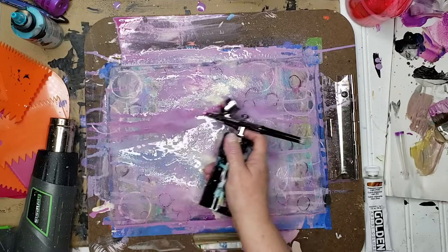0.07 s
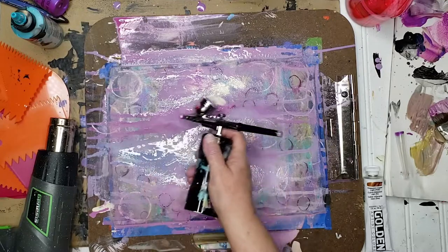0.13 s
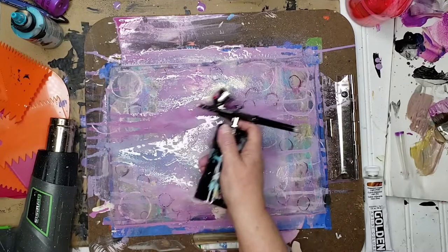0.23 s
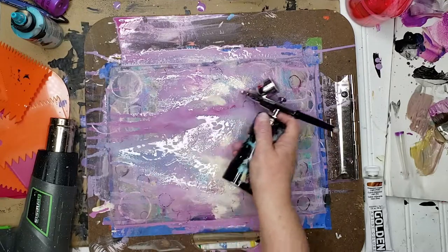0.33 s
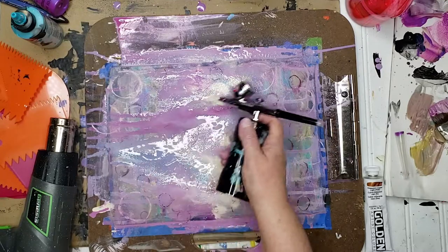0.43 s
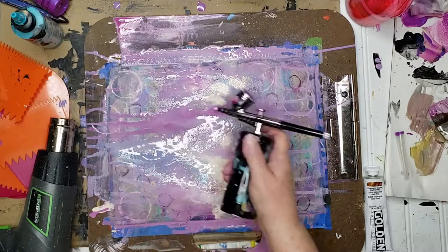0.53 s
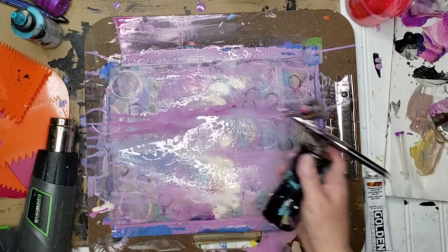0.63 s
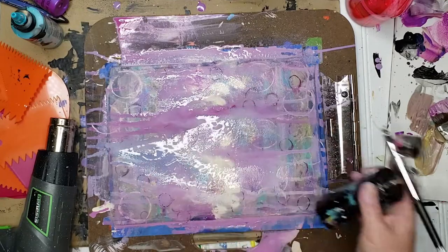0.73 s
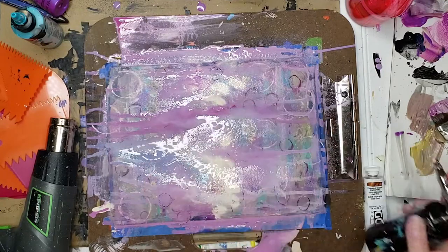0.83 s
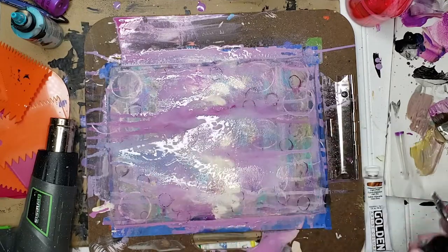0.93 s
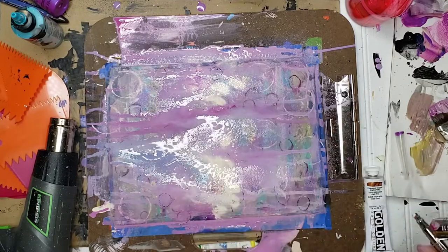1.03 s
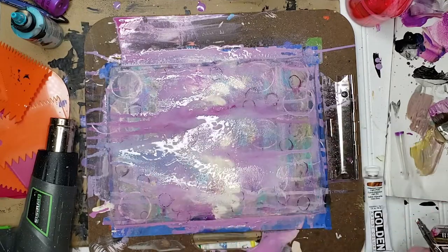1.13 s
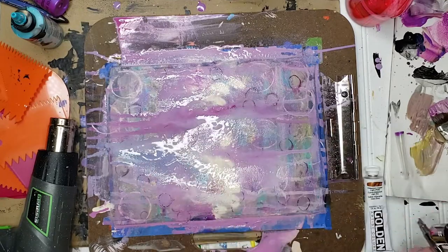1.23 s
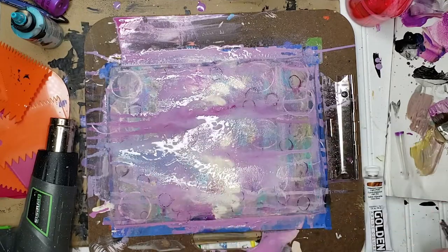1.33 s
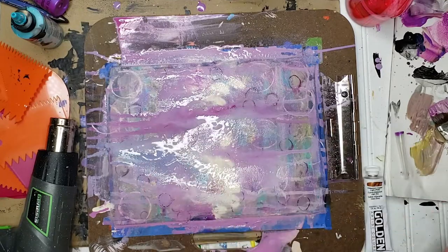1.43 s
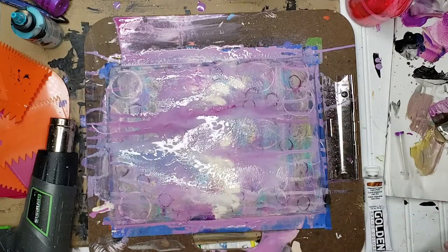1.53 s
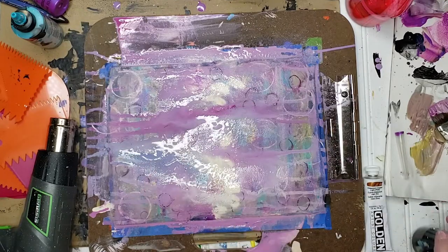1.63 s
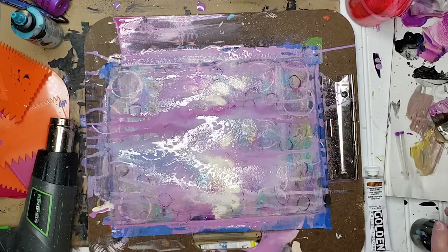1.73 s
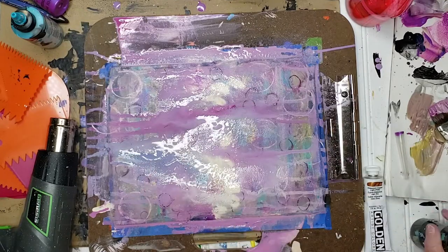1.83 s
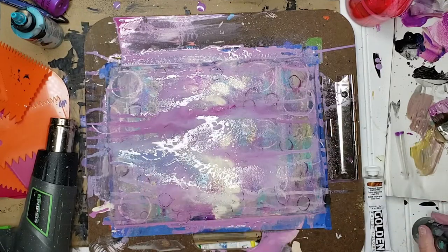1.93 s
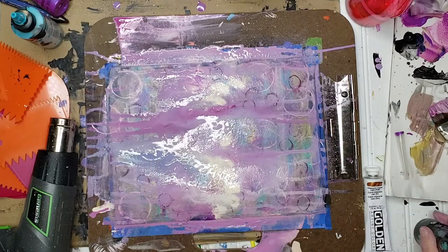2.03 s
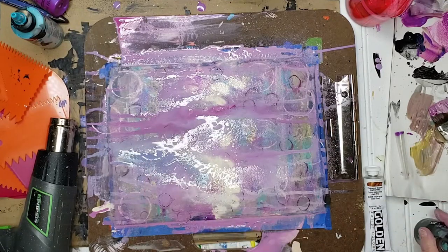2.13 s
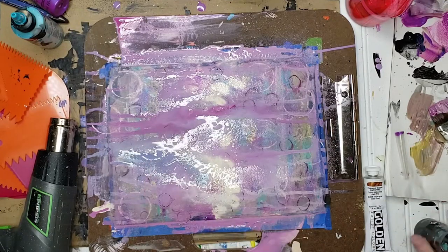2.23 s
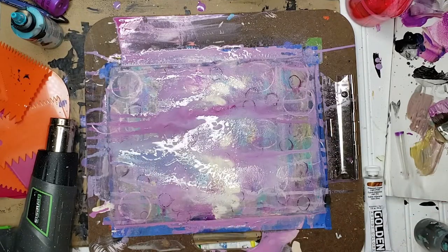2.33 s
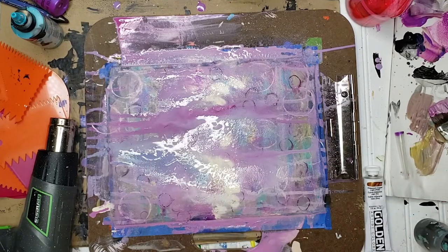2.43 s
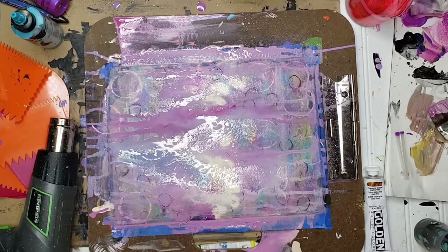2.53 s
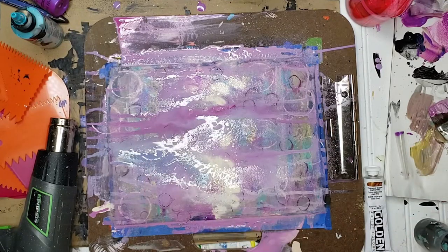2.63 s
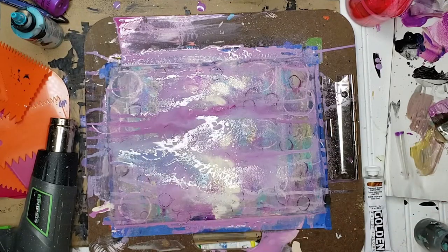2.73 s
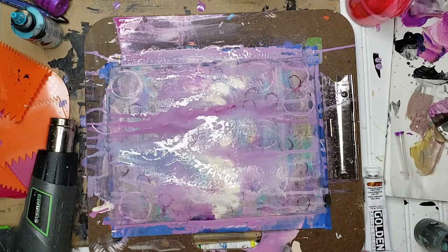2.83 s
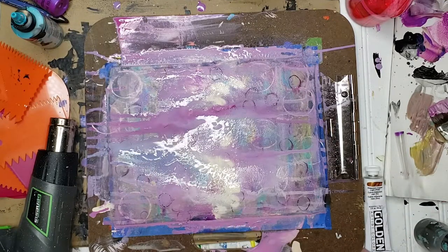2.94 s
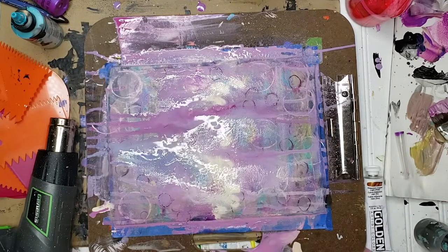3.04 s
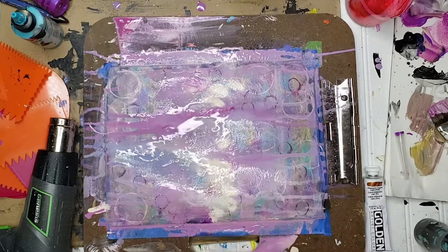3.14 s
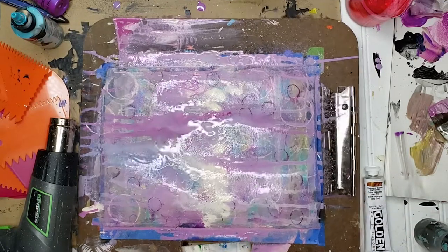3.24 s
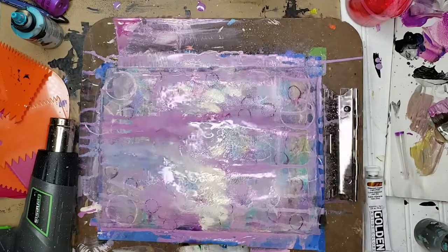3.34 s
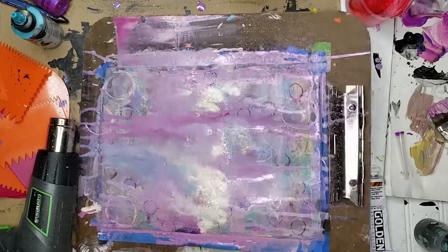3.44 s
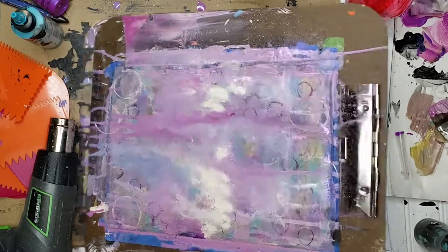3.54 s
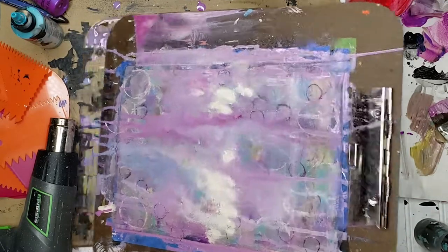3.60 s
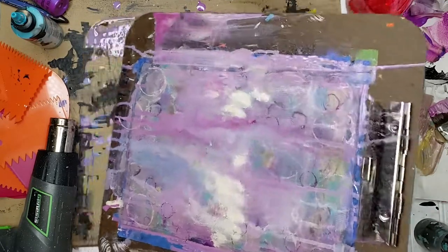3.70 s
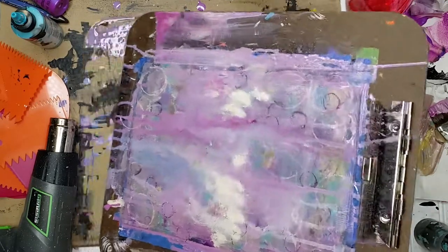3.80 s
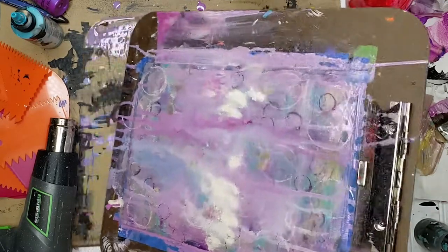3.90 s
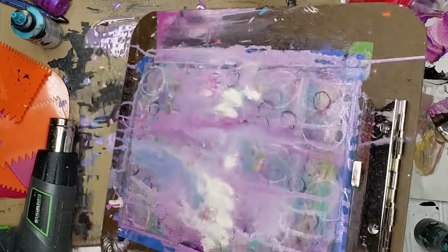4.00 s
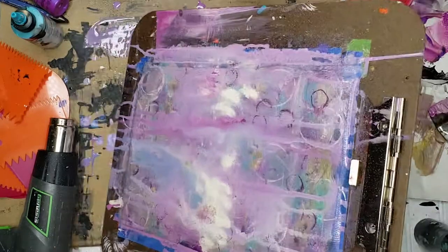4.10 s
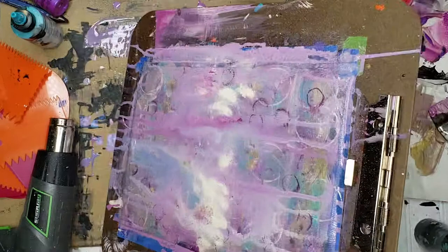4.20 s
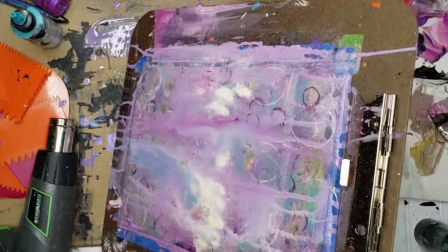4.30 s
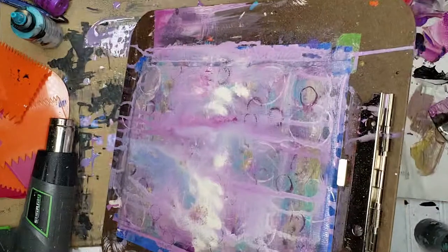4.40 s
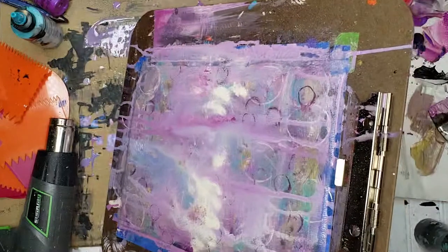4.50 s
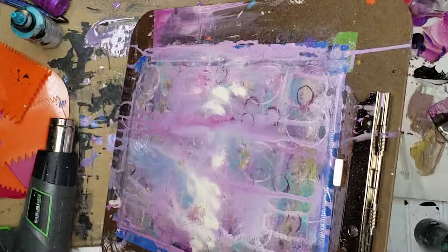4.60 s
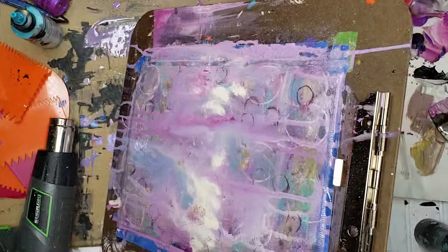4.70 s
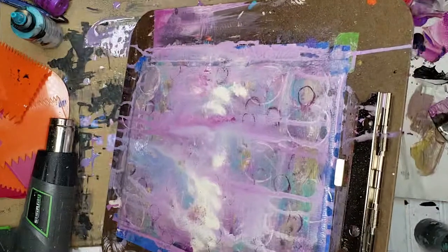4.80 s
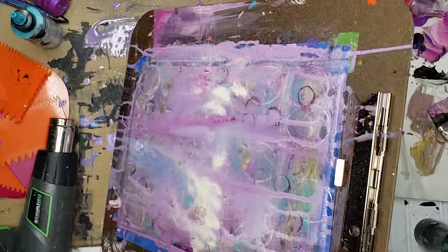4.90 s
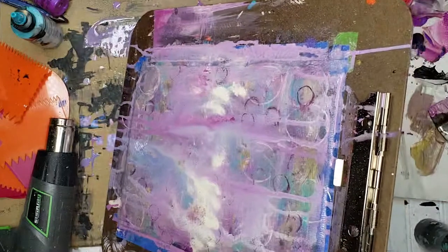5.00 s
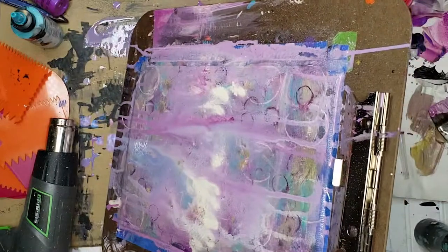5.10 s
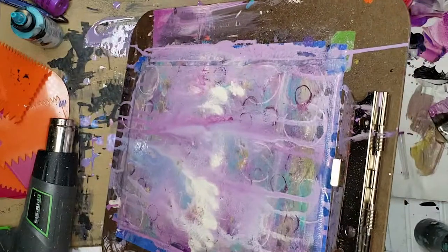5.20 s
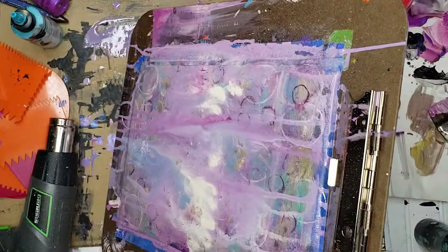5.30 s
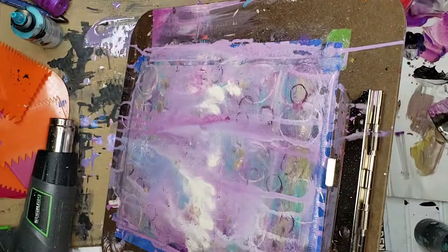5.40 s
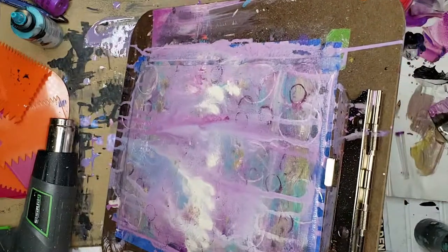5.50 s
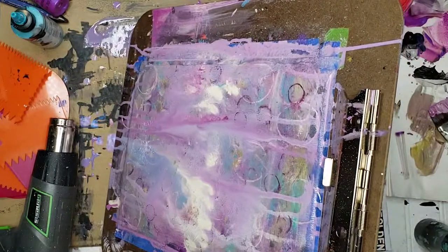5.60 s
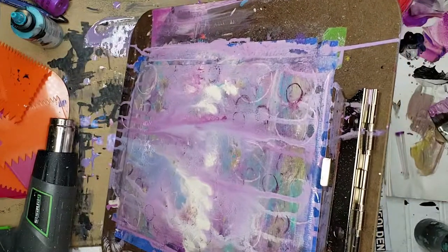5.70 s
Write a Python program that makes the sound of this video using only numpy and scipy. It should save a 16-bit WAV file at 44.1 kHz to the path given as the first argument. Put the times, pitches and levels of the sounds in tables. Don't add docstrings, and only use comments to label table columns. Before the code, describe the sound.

From 0 to about 1.4 s a small battery airbrush blows a bright, steady, airy hiss, with a faint low pump buzz and rattle that changes colour as the hand turns aside from 0.6 s. A soft fan drone lies beneath throughout. At 0.7 s a short dull plastic scrape. At 1.38 s a loud crisp switch click cuts the air, which dies within a fraction of a second; a sharp snap follows at 1.56 s. At 1.73 s the tool lands with a heavy wooden double thud, the loudest blow. Weaker knocks and hand bumps come at 2.0, 2.3 and 2.7 s, with a quick wipe. Around 2.8 s a thin steel clasp ticks. From 3 to 4 s come small clicks, faint squeaks, a grainy board drag with a low rumble near 3.55 s, and a groan at 3.8 s. Then nearly only drone, with one tiny tick at 5.36 s.

```python
import sys
import numpy as np
from scipy import signal
from scipy.fft import rfft, irfft, next_fast_len
from scipy.io import wavfile
from scipy.ndimage import uniform_filter1d, minimum_filter1d, map_coordinates

SR = 44100
rng = np.random.default_rng(int(sys.argv[2]) if len(sys.argv) > 2 else 0)


def store_pcm(level_fs):
    pcm = np.round(np.clip(level_fs, -1, 1) * 32767).astype(np.int16)
    wavfile.write(sys.argv[1], SR, np.atleast_2d(pcm).T)


def boost(x):
    u = np.asarray(x, float) / 20
    return 10 ** u


N = 253575

# time in seconds, level in dB.
JET_FLOW = [(0, -29), (.25, -28), (.3, -29.5), (.4, -28), (.54, -29.5), (.6, -27.5), (1.24, -29),
            (1.38, -32)]
# frequency in Hz, density in dB per Hz.
FINE_HISS = [(4900, -21), (8000, -16), (9460, -8), (11900, -1), (12800, -2), (14300, 1), (15100, 4),
             (15800, 1)]
COARSE_HISS = [(1900, -40), (2250, -26), (2600, -13), (3200, -15.5), (4100, -10.5), (4550, -14),
               (5000, -9.5), (6400, -3.5), (8000, -1.5), (9500, -7), (12400, -25), (20000, -120)]
# frequency in Hz, width in Hz, level in dB.
CASING_FACING = [(540, 124, -14), (872, 44, -15), (1597, 147, -19), (1702, 56, -14.5), (1890, 70, -15.5),
                 (2245, 67, -23), (2500, 48, -27), (2970, 40, -30), (3320, 24, -24), (3780, 34, -26)]
CASING_ASIDE = [(387, 61, -13.5), (680, 55, -15.5), (937, 43, -10), (1294, 41, -14.5), (1700, 58, -28),
                (1870, 54, -37), (2150, 45, -29), (3140, 56, -20), (3310, 70, -31), (3610, 57, -17.5)]
# frequency in Hz, density in dB per Hz.
HOUSING_RATTLE = [(600, -3), (800, 0.5), (1100, -6.5), (1500, -5.5), (1900, -1), (2150, -16), (2400, -37)]
# frequency in Hz, density in dB per Hz.
FAN_DRONE = [(15, -57), (25, -27.5), (36, -19.5), (55, -10), (139, 3), (195, -7.5), (231, -4.5), (324, -5),
             (339, -11), (378, -8), (409, -20.5), (477, -13), (601, -30.5), (746, -26), (1000, -45),
             (1300, -72.5), (2200, -120)]
MICROPHONE_HUSH = [(530, -32.5), (900, -3), (1400, -12), (1580, -13), (1940, -12.5), (2320, -15.5),
                   (3890, -18.5), (7600, -25.5), (11700, -15.5), (15800, -12.5)]
# frequency in Hz, width in Hz, lift in dB.
DUCT_HUMPS = [(61.9, 3, 12.5), (75, 8, -4.5), (114, 10.8, -1.5), (135.5, 19, 0), (230.7, 4.7, 11.5),
              (268, 3.2, 2.5), (307, 7.6, 9), (366.6, 4.7, 2.5), (496, 40, 2), (552.7, 4.3, 13)]
# frequency in Hz, level in dB.
MOTOR_LINES = [(646.8, -74), (727.4, -65), (739.2, -67), (831.6, -73), (924.1, -78), (1091.3, -83),
               (1201.1, -83)]
# time in seconds, level in dB.
DRONE_SWELL = [(0, -36), (1.9, -36), (2.7, -38), (3.75, -35.5), (4.05, -38.5), (5.75, -37.5)]
# frequency in Hz, width in Hz, level in dB.
PLASTIC_BODY = [(700, 31, 2), (1500, 170, -4), (1730, 140, 0), (2020, 340, -0.5)]
# frequency in Hz, width in Hz, level in dB.
CLICK_SHELL = [(3200, 900, 0), (3900, 1000, -2)]
CLICK_METAL = [(5900, 1200, -1), (7100, 1200, -0.1)]
CLICK_EDGE = [(9600, 800, -5), (10800, 530, 2), (11600, 1100, 4), (14320, 3300, 1)]
# start in seconds, level in dB, brightness in dB.
SMALL_TICKS = [(1.5247, -57, 5), (2.7075, -57, 0), (2.802, -53, 3), (2.823, -61, 5), (2.9494, -66, -11),
               (3.022, -53, -8), (3.059, -47, -4.5), (3.1078, -52, -2), (3.7694, -50, 6), (3.834, -56, -1),
               (4.0178, -54.5, -3.5), (4.04, -65, -5), (5.3647, -63.5, 4.5)]
# start in seconds, level in dB, contact in seconds, hardness in Hz.
TABLE_BLOWS = [
    (1.732, -1.5, 0.027, 3180),
    (1.743, -8, 0.022, 1500),
    (1.808, -34.5, 0.0056, 800),
    (1.984, -22.5, 0.023, 1100),
    (2.034, -29, 0.012, 900),
    (2.268, -30, 0.02, 2000),
    (2.312, -31.5, 0.014, 1400),
    (2.707, -32, 0.0086, 1200),
]
# frequency in Hz, density in dB per Hz.
WOOD_BODY = [(29, -49), (50, 20), (134, -10.5), (263, 4), (400, -0.5), (543, -12), (627, -3), (707, -6),
             (1010, -11.5), (1700, -15), (2450, -23), (7310, -34), (15800, -41.5)]
# frequency in Hz, 60 dB decay in seconds.
TABLE_MODES = [(140, .08), (224, .12), (340, .11), (430, .1), (520, .09), (711, .11), (835, .09),
               (950, .08), (1240, .07), (1980, .06)]
# frequency in Hz, density in dB per Hz.
SKIN_RUB = [(7500, -22), (9000, -9), (10500, 3), (12000, 2.5), (13500, 3), (15000, -1), (15800, 2.5)]
PAPER_RUB = [(4200, -18.5), (5200, -14.5), (7200, -5.5), (8200, -13.5), (9500, -13)]
BOARD_RUB = [(240, -47), (400, 1), (604, -17), (700, -8.5), (1180, -12.5), (1270, -12.5), (1680, -15),
             (2310, -11), (2520, -12), (5000, -23), (6500, -61.5), (11000, -120)]
# frequency in Hz, density in dB per Hz.
HEAVE_RUMBLE = [(250, -13), (400, 5.5), (550, 2), (750, -8), (950, -31), (1300, -17.5)]
# start in seconds, hold in seconds, level in dB.
PALM_WIPES = [
    (1.87, .03, -56.5),
    (1.945, 0.0072, -37.5),
    (2.235, 0.027, -50),
    (3.15, 0.04, -55),
    (3.235, 0.018, -47.5),
]
# start in seconds, hold in seconds, level in dB.
BOARD_DRAGS = [
    (3.5, .01, -61.5),
    (3.565, .155, -43.5),
    (3.93, 0.025, -66),
]
# start in seconds, hold in seconds, level in dB.
SETTLING_SCUFFS = [
    (1.79, 0.0059, -58),
    (2.275, .02, -58.5),
    (2.718, .01, -65),
    (2.8, 0.009, -58.5),
    (3.022, 0.0078, -59.5),
    (3.545, .01, -57),
    (4.02, .005, -70),
]
# frequency in Hz, width in Hz, level in dB.
GROAN_MODES = [(1380, 120, 0), (1620, 170, -3), (1880, 130, -3)]
# start in seconds, hold in seconds, level in dB.
BOARD_GROANS = [
    (3.06, 0.025, -66),
    (3.28, 0.085, -75),
    (3.777, 0.14, -63),
    (4.2, 0.42, -80.5),
    (4.62, .01, -72),
]
# start in seconds, hold in seconds, level in dB, pitch in Hz.
EDGE_SQUEAKS = [
    (3.08, 0.011, -61.5, 2350),
    (3.21, .07, -72, 2320),
    (3.26, 0.11, -66.5, 1340),
    (3.327, 0.057, -74, 1850),
    (3.9, 0.075, -69.5, 2310),
    (3.903, 0.061, -74, 1590),
    (4.02, 0.086, -74, 1340),
]
# frequency in Hz, level in dB, 60 dB decay in seconds.
CLASP_MODES = [(2800, 0.5, 0.078), (4460, -5, 0.04), (6700, -7, .05), (9300, 6.5, 0.028), (10500, 0, .04)]
# start in seconds, level in dB.
CLASP_TOUCHES = [
    (2.803, -50),
    (2.819, -48.5),
    (2.829, -59),
]
# frequency in Hz, left over right in dB.
PORT_SHADOW = [(80, 9.5), (250, 4.5), (700, 9.5), (2000, 8.5), (4000, 8.5), (7000, 10.5), (10500, 2.5),
               (15000, 3.5)]
# frequency in Hz, correlation from 0 to 1.
PORT_LIKENESS = [(60, 0.91), (250, 0.98), (550, 0.74), (1100, 0.15), (2500, 0.08), (8000, 0.027)]
# frequency in Hz, lead in radians.
PORT_LEAD = [(60, .12), (150, .25), (300, .42), (600, .2), (1200, -.6)]
# frequency in Hz, 60 dB decay in seconds.
ROOM_DECAY = [(100, 0.13), (500, 0.18), (2000, 0.27), (5300, 0.26), (14000, 0.15)]

SWITCH_OFF_S = 1.381


def unit(x):
    return x / np.sqrt(np.mean(np.mean(np.atleast_2d(x), axis=0) ** 2) + 1e-20)


def along(points, hz):
    f, v = np.transpose(points)
    return np.interp(np.log(hz + 1), np.log(f + 1), v)


def curve(rows):
    s, value = np.transpose(rows)
    return np.interp(np.arange(N) / SR, s, value)


def wobble(rate, size=N):
    knots = rng.standard_normal(int(size * rate / SR) + 4)
    return map_coordinates(knots, [np.arange(size) * rate / SR])


def filtered(x, response):
    n = x.shape[-1]
    m = next_fast_len(n + 8192)
    return irfft(rfft(x, m) * response(np.fft.rfftfreq(m, 1 / SR)), m)[..., :n]


def resonances(modes):
    def response(f):
        total = 0
        for k, (hz, width, db) in enumerate(modes):
            damping = 1j * f * width
            total = total + (-1) ** k * boost(db) * damping / (hz * hz - f * f + damping)
        return total
    return response


def ports(pair):
    def mid_side(hz):
        turn = np.arccos(np.clip(along(PORT_LIKENESS, hz), -1, 1)) / 2
        return np.array([np.cos(turn), np.sin(turn)])

    def shadow(hz):
        half = boost(along(PORT_SHADOW, hz) / 2) * np.exp(-.5j * along(PORT_LEAD, hz))
        return np.array([half, 1 / half])

    mid, side = filtered(pair, mid_side)
    return filtered(np.array([mid + side, mid - side]), shadow)


def rush(spectrum, patchy_db):
    z = signal.stft(rng.standard_normal((2, N)), nperseg=512)[2]
    field = uniform_filter1d(rng.standard_normal(z.shape[1:]), size=6, axis=0)
    field = uniform_filter1d(field, size=12, axis=1)
    patches = boost(patchy_db * unit(field.ravel()).reshape(field.shape))
    pair = signal.istft(z * patches, nperseg=512)[1][:, :N]
    closed = [(spectrum[0][0] / 2, -90), *spectrum]
    return unit(ports(filtered(pair, lambda hz: boost(along(closed, hz)))))


def echoes(x):
    hz, t, z = signal.stft(rng.standard_normal((2, SR // 2)), SR, nperseg=256)
    decay = boost(-60 * t / along(ROOM_DECAY, hz)[:, None])
    tail = signal.istft(z * decay, SR, nperseg=256)[1]
    late = np.pad(x, ((0, 0), (150, 0)))
    return signal.fftconvolve(late, tail / np.linalg.norm(tail[0]), axes=1)[:, :x.shape[1]]


def strokes(rows, rise, fall):
    t = np.arange(N) / SR
    gain = 0
    for s, hold, db in rows:
        gain = gain + boost(db - rise * np.clip(s - t, 0, 1) - fall * np.clip(t - s - hold, 0, 1))
    return gain


def casing(modes, hz):
    power = sum(boost(2 * db) / (1 + ((hz - c) / w) ** 4) for c, w, db in modes)
    return 10 * np.log10(power + boost(-82))


def spray(cycle, aside):
    facing_lean_db, aside_lean_db = -2.5, 1.5
    lean_db = facing_lean_db + aside * (aside_lean_db - facing_lean_db)
    jet = rush(FINE_HISS, patchy_db=1.5) + boost(-16) * rush(COARSE_HISS, patchy_db=2.2)
    flow = boost(curve(JET_FLOW) + 1.0 * wobble(11.67))
    puffs = 1 + 0.061 * np.cos(cycle)
    return jet * flow * puffs * boost(np.outer([.5, -.5], lean_db))


def pump(cycle, aside, pump_hz):
    pump_db = -44.5
    buzz, on = np.zeros((2, N)), round(1.6 * SR)
    for k in range(5, 47):
        facing = boost(2 * casing(CASING_FACING, k * pump_hz))
        turned = boost(2 * casing(CASING_ASIDE, k * pump_hz))
        db = pump_db + 10 * np.log10((1 - aside[:on]) ** 2 * facing + aside[:on] * turned)
        flutter_db = 3.5 * np.array([wobble(14, size=on), wobble(14, size=on)])
        shade_db = np.array([[0], [-.3 * k]])
        phase = 2 * np.pi * rng.random((2, 1))
        buzz[:, :on] += boost(db + flutter_db + shade_db) * np.sin(k * cycle[:on] + phase)
    strokes_gain = boost(pump_db - 13.5 - 2.2 * aside) * (1 + 0.61 * np.cos(cycle))
    rattle = strokes_gain * rush(HOUSING_RATTLE, patchy_db=-2.0) * boost([[.6], [-4]])
    return rattle + buzz * boost([[8.], [-5.]])


def airbrush():
    pump_hz, turn_s, turn_lasts_s = 77.2, 0.6, 0.6
    t = np.arange(N) / SR
    aside = np.clip((t - turn_s) / turn_lasts_s, 0, 1)
    cycle = 2 * np.pi * np.cumsum(pump_hz * (1 + 0.00093 * wobble(3.05))) / SR
    since_off = np.clip(t - SWITCH_OFF_S, 0, 1)
    jet = spray(cycle, aside) * boost(-60 * since_off / 0.18)
    return jet + pump(cycle, aside, pump_hz) * boost(-60 * since_off / 0.056)


def room():
    def duct(f):
        return boost(sum(db / (1 + ((f - c) / w) ** 2) for c, w, db in DUCT_HUMPS))

    t = np.arange(N) / SR
    drone = unit(filtered(rush(FAN_DRONE, patchy_db=0.83), duct))
    drone = drone * boost(curve(DRONE_SWELL) - 0.5 + .8 * wobble(1.9))
    lines = np.zeros(N)
    for hz, db in MOTOR_LINES:
        lines += boost(db + 3.0 + 0.64 * wobble(3.62)) * np.sin(2 * np.pi * (hz * t + rng.random()))
    hush = boost(-61.5) * rush(MICROPHONE_HUSH, patchy_db=-0.35) * boost([[-1.2], [2.2]])
    return drone + lines * boost([[3.], [-5.]]) + hush


def bump():
    start_s, contact_s, level_db = .684, 0.043, -32.5
    t = np.arange(N) / SR - start_s
    scrape = rng.standard_normal((2, N)) * (t > 0) * boost(-20 * (np.clip(t, 0, 1) / contact_s) ** 4)
    body = filtered(scrape, resonances(PLASTIC_BODY))
    return boost(level_db + 10.0) * ports(body + boost(-3.5) * echoes(body))


def clicks():
    out, t = np.zeros((2, N + SR)), np.arange(SR // 3) / SR
    switch = (SWITCH_OFF_S, -2.5, -22.5, -19, -16.5, -15.5)
    catch = (1.5599, -8, -27, -13.5, -7.5, -13.5)
    ticks = [(s, db, -bright_db, 0, bright_db, -14.5) for s, db, bright_db in SMALL_TICKS]
    for s, db, shell_db, metal_db, edge_db, echo_db in [switch, catch, *ticks]:
        crack = np.sign(rng.standard_normal((2, len(t)))) * boost(-60 * t / .0025)
        parts = [(CLICK_SHELL, shell_db), (CLICK_METAL, metal_db), (CLICK_EDGE, edge_db)]
        tick = sum(boost(level) * filtered(crack, resonances(modes)) for modes, level in parts)
        out[:, round(s * SR):][:, :len(t)] += boost(db + 19) * (tick + boost(echo_db + 10.5) * echoes(tick))
    return ports(out[:, :N])


def knocks():
    out, t = np.zeros((2, N + SR)), np.arange(SR // 2) / SR
    modes = resonances([(hz, np.log(1000) / np.pi / t60, 2) for hz, t60 in TABLE_MODES])
    for s, db, contact, hard_hz in TABLE_BLOWS:
        thin_hz = 0.081 * hard_hz
        echo_db = -8.5 - 0.2668 * db
        push = rng.standard_normal((2, len(t))) * boost(-20 * (t / contact) ** 2) * np.minimum(1, t / 0.0017)
        push[0] += boost(-4) * np.sin(2 * np.pi * 140 * t) * boost(-60 * t / 0.066)

        def table(hz):
            thin = (1j * hz / (thin_hz + 1j * hz)) ** 2
            dull = (1 + 1j * hz * hard_hz / 3000 ** 2) ** 2 / (1 + 1j * hz / hard_hz) ** 2
            return boost(along(WOOD_BODY, hz)) * (1 + modes(hz)) * thin * dull

        blow = filtered(push, table)
        out[:, round(s * SR):][:, :len(t)] += boost(db + 14.5) * (blow + boost(echo_db) * echoes(blow))
    return ports(out[:, :N]) * boost([[-.6], [.6]])


def rubs():
    wipes = np.outer(boost([-3, -7, -31.5]), strokes(PALM_WIPES, rise=197.5, fall=235))
    drags = np.outer(boost([-3, 1, -1]), strokes(BOARD_DRAGS, rise=263, fall=295))
    scuffs = np.outer(boost([-2, 2, -4.5]), strokes(SETTLING_SCUFFS, rise=1499.5, fall=121))
    skin, paper, board = wipes + drags + scuffs
    heave = strokes([(3.545, .01, -36.5)], rise=320, fall=75)
    soft = skin * rush(SKIN_RUB, patchy_db=1.2) + paper * rush(PAPER_RUB, patchy_db=1.3)
    wood = board * boost(4.5) * rush(BOARD_RUB, patchy_db=2.0)
    return soft + wood + heave * rush(HEAVE_RUMBLE, patchy_db=2.5)


def groans():
    groan_noise, squeak_noise = rng.standard_normal((2, 2, N))
    groan = unit(ports(filtered(groan_noise, resonances(GROAN_MODES))))
    squeaks = np.zeros((2, N))
    for *stroke, hz in EDGE_SQUEAKS:
        mode = resonances([(hz, 170, 0)])
        narrow = unit(filtered(squeak_noise, lambda f: mode(f) ** 2))
        squeaks += strokes([stroke], rise=290, fall=280) * narrow
    return strokes(BOARD_GROANS, rise=115, fall=70) * groan + ports(squeaks)


def slides():
    drag = boost(0.71 * wobble(33) + 0.88 * wobble(300))
    return drag * (rubs() + groans())


def clasp():
    out, t = np.zeros((2, N)), np.arange(SR // 8) / SR
    for s, db in CLASP_TOUCHES:
        for hz, level, t60 in CLASP_MODES:
            size = boost(db + level + rng.normal(0, 2, (2, 1)) - 60 * t / t60)
            out[:, round(s * SR):][:, :len(t)] += size * np.sin(2 * np.pi * (hz * t + rng.random((2, 1))))
    return ports(out)


def scene():
    return airbrush() + room() + bump() + clicks() + knocks() + slides() + clasp()


def starve(x, under_db, dip_db):
    hz, _, z = signal.stft(x, SR, nperseg=2048)
    power = uniform_filter1d(abs(z) ** 2, size=5, axis=1)[:, 2::5]
    bands = hz[2::5]
    treble = power[:, (bands > 9000) & (bands < 15500)].mean(axis=1)
    treble = minimum_filter1d(treble, size=5, axis=1)
    around = minimum_filter1d(uniform_filter1d(power, size=15, axis=1), size=5, axis=2)
    weak = (power < boost(2 * under_db) * treble[:, None]) & (power < boost(2 * dip_db) * around)
    weak[..., 1:] |= weak[..., :-1].copy()
    gone = np.repeat(weak & (bands > 2000)[:, None], 5, axis=1)
    return signal.istft(z * ~gone, SR, nperseg=2048)[1][:, :N]


def roll_off(x):
    return signal.sosfilt(signal.butter(12, 16990, fs=SR, output="sos"), x)


def record(dry):
    top_hz = 15745
    x = starve(dry, under_db=-10, dip_db=-4)
    x = filtered(x, lambda hz: np.clip((top_hz - hz) / 90 + .5, 0, 1) ** 2)
    return roll_off(np.clip(x, -1, 1))


dry = scene()
out = record(dry)
store_pcm(out)
```